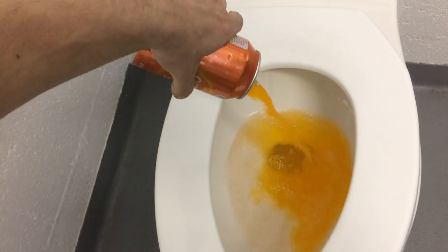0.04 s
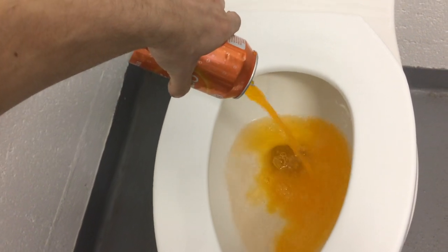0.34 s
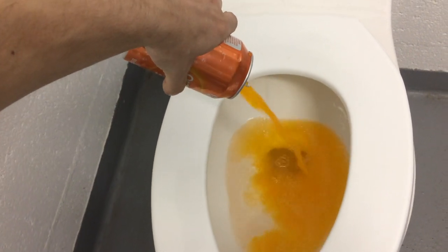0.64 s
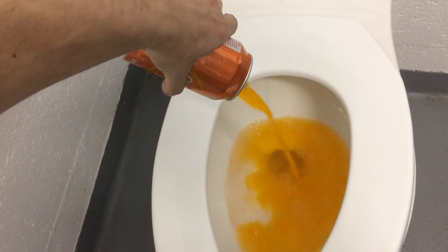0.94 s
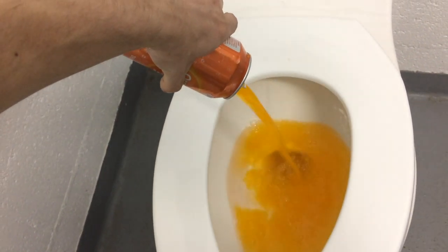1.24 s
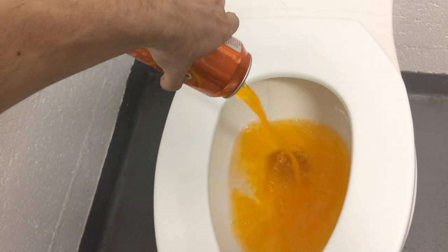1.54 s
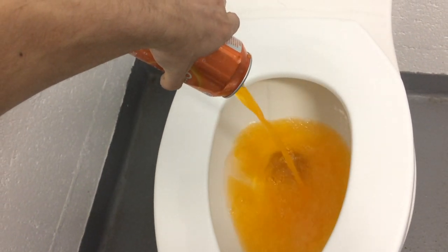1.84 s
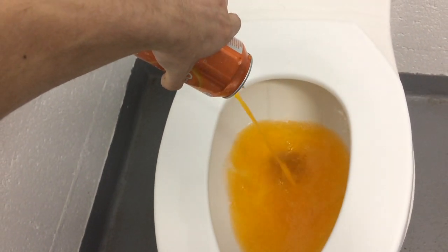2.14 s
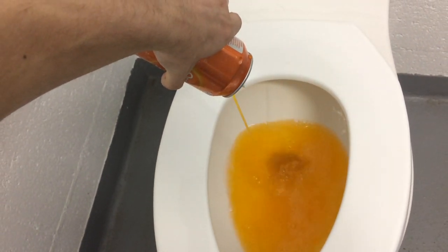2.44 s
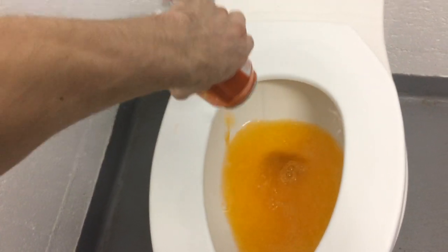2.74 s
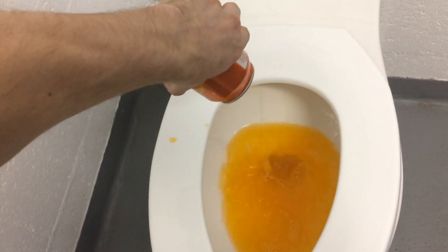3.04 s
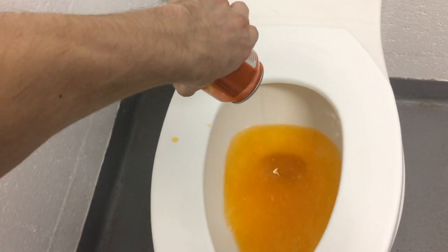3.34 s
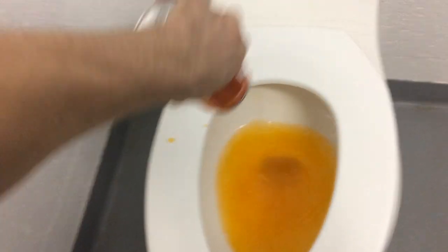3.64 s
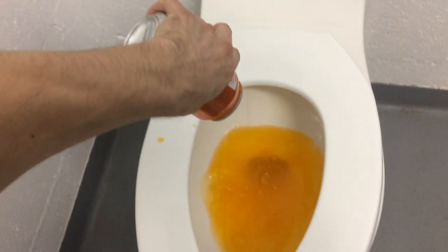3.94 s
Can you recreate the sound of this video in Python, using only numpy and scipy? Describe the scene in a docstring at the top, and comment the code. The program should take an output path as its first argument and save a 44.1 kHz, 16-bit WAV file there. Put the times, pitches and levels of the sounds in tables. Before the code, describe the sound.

A drink poured into toilet water bubbles and fizzes, ending in a few drips.

```python
"""Soda poured into a toilet bowl

A can is emptied close by in a small tiled bathroom. The stream drags air under: big pockets glug,
swarms of smaller bubbles burble and fizz, and spray smacks the surface. The stream thins to a
trickle and a few last drips plink, over the low hum of a fan."""
import sys
import numpy as np
from scipy import signal
from scipy.fft import rfft, irfft, next_fast_len
from scipy.io import wavfile
from scipy.ndimage import uniform_filter1d

SR = 44100
rng = np.random.default_rng(int(sys.argv[2]) if len(sys.argv) > 2 else 0)


def output_pcm(signal):
    """Save a mono or channel-first signal as 16-bit PCM at the path in sys.argv[1].

    Samples are clipped to [-1, 1] before scaling.
    """
    pcm = np.clip(np.atleast_2d(signal).T, -1, 1) * 32767
    wavfile.write(sys.argv[1], SR, np.round(pcm).astype(np.int16))


N = 176400

# Big air pockets: start_s, level_db, pitch_hz
GLUGS = [(0.023, -4, 318.6), (0.094, -3.5, 292), (0.153, -8.5, 297.4), (0.221, -16, 326), (0.273, -6, 281),
         (0.338, -4, 282.6), (.36, -4, 304), (0.407, -7, 284), (0.482, -11, 284), (0.613, -5.5, 314),
         (0.689, -10, 298.6), (0.802, -4.5, 299.7), (.842, -0.5, 284.3), (0.878, -10, 195),
         (.895, -5, 239.3), (.912, -2, 265.7), (0.964, -5.5, 281.5), (1.048, -6, 270.7),
         (1.234, -8.5, 305.6), (1.282, -6, 288.3), (1.402, 4, 274), (1.435, -1.5, 267.2),
         (1.492, -5.5, 273), (1.561, -4.5, 276.2), (1.776, -3.5, 280.2), (1.866, -14, 296.4),
         (1.931, -8.5, 276.4), (2.024, -4, 317.7), (2.07, -11.5, 293), (2.167, -18, 288),
         (2.228, -7, 258.7), (2.269, -6, 318), (2.358, -11, 352), (2.383, -10, 294)]


def glugs():
    """Large pockets of air boom in the bowl, each bending slightly up in pitch."""
    out = np.zeros(N)
    for start_s, level_db, pitch_hz in GLUGS:
        boom = bubble(pitch_hz, t60_s=0.24, glide=0.01344, rise_s=0.008, size=16000)
        add(out, start_s, amp(level_db - 0.5) * boom)
    return signal.lfilter(*signal.butter(2, 120, "high", fs=SR), out)


# Fader rides for the low, middle and upper swarms: time_s, level_db
GURGLE_FADER = [(0, -21.5), (.4, -14), (.55, -22.5), (.95, -18.5), (1.15, -19.5), (1.45, -18),
                (1.72, -21.5), (2.05, -18.5), (2.33, -14), (2.5, -21), (2.7, -30.5), (2.9, -38.5),
                (3.2, -48.5), (4, -83)]
PLOP_FADER = [(0, -17.5), (.12, -21.5), (.33, -26), (.5, -31), (.88, -28), (.96, -15.5), (1.1, -28.5),
              (1.7, -36), (2.3, -29.5), (2.48, -32), (2.57, -26), (2.66, -28.5), (2.73, -24.5),
              (2.9, -38.5), (3.1, -48), (4, -73)]
BURBLE_FADER = [(0, -13.5), (.12, -24), (.21, -15), (.34, -14.5), (.45, -36), (.57, -30), (.65, -17.5),
                (.85, -29), (1.02, -16.5), (1.2, -30.5), (1.37, -16), (1.43, -17), (1.55, -29.5),
                (1.85, -26.5), (2.25, -25), (2.6, -26.5), (2.85, -36.5), (3.1, -88)]
# Nasal tone of the burble: frequency_hz, gain_db
BURBLE_EQ = [(750, -22), (950, -4.5), (1080, 0), (1210, 10), (1330, -3), (1500, -1.5), (1850, 2.5),
             (2300, 3.5), (2900, -11)]


def bubbling():
    """The body of the pour: air dragged under rings as bubbles, the smaller the higher."""
    gurgle = swarm(per_s=190, band_hz=(251.5, 365.7), cycles=45.5, glide=0.039, spread_db=2, voices=20)
    plop = swarm(per_s=340, band_hz=(386, 742), cycles=54, glide=0.053, spread_db=3, voices=24)
    burble = swarm(per_s=1000, band_hz=(831, 2560), cycles=18.7, glide=0.081, spread_db=6)
    return (amp(-2.5) * ride(gurgle, GURGLE_FADER)
            + amp(-4.5) * ride(plop, PLOP_FADER)
            + amp(-3) * ride(eq(burble, BURBLE_EQ), BURBLE_FADER))


# Fader rides for tinkle and spray together, and for the foam's fizz: time_s, level_db
SPLASH_FADER = [(0, -15.5), (.12, -23.5), (.33, -18), (.55, -25.5), (.67, -24), (.87, -26), (1.02, -22),
                (1.35, -25.5), (1.7, -23.5), (2.1, -23), (2.4, -26), (2.65, -33.5), (2.88, -36.5),
                (3.1, -41.5), (4, -58.5)]
FIZZ_FADER = [(0, -34), (.3, -33.5), (.55, -37), (.68, -37), (.85, -31.5), (1.1, -36.5), (1.35, -33.5),
              (1.7, -31), (2.35, -32), (2.6, -39.5), (2.9, -37.5), (3.2, -47), (4, -52)]
# Tone of the three bright layers: frequency_hz, gain_db
TINKLE_EQ = [(1500, -20), (2700, 5), (3700, 1.5), (4300, 1), (5100, 7), (5800, -0.5), (7000, -2.5)]
FIZZ_EQ = [(6000, 2), (8000, -1), (11500, -4), (15000, -9.5)]
SPRAY_EQ = [(150, -13), (500, -3.5), (1200, 3.5), (2500, 3), (5000, -5), (8000, -10.5), (15000, -12.5)]


def fizz_and_spray():
    """The top end: small bubbles tinkle, the finest fizz as foam, and droplets patter on the water."""
    tinkle = swarm(per_s=800, band_hz=(2470, 7350), cycles=13, glide=0.06, spread_db=6)
    fizz = swarm(per_s=580, band_hz=(6200, 15200), cycles=14, glide=0.078, spread_db=5, scatter=0.95)
    droplets = rng.choice([-1, 1], N) * (rng.random(N) < 700 / SR)  # about 700 ticks a second
    droplets = droplets * amp(5.2 * np.minimum(rng.exponential(1, N), 4))
    spray = bowl(droplets, scatter=0.4)[:N]
    return (amp(-6) * ride(eq(tinkle, TINKLE_EQ), SPLASH_FADER)
            + amp(-6) * ride(eq(spray, SPRAY_EQ), SPLASH_FADER)
            + amp(-2) * ride(eq(fizz, FIZZ_EQ), FIZZ_FADER))


# Spray hitting the water: start_s, level_db, pitch_hz, click_vs_bubble_db
SMACKS = [(0.0246, -3.5, 2320, -0.5), (0.036, -8, 6300, -2), (0.0834, -8, 5000, -16),
          (0.119, -28.5, 6040, 14), (0.203, -22, 5400, 7), (0.227, -3.5, 4900, -5.5), (0.281, -8, 2900, -1),
          (0.328, -2.5, 1200, -11), (.3346, -4, 3930, -3), (0.595, -12, 1280, 0.5),
          (0.6204, -9.5, 2770, -3), (0.6504, -6.5, 2290, -6), (.657, -18.5, 5300, 6),
          (0.6934, -10, 7300, -5.5), (0.731, -14, 6160, -8), (0.7977, -6, 4420, -3.5),
          (0.9307, -16.5, 3800, 14), (0.9803, -5, 4800, -4.5), (1.069, -14.5, 4400, 5),
          (1.1742, -4.5, 2920, -5.5), (1.1888, -18.5, 5330, 6), (1.2527, -8.5, 6750, -18),
          (1.2875, -11.5, 2840, 0.5), (1.3078, -11, 4800, 5), (1.4008, -1, 4700, -1.5),
          (1.444, -6.5, 1620, -3), (1.492, -5, 9200, -5.5), (1.5563, -9, 4900, -9), (1.568, -14.5, 5100, 3),
          (1.583, -20, 7300, 11), (1.7728, -15, 5700, 11), (1.9014, -10, 3900, 2.5), (1.909, -9.5, 5170, 1),
          (2.0188, -4.5, 4300, -11), (2.043, -26.5, 5900, 11), (2.1559, -9.5, 3430, -19),
          (2.171, -17.5, 8700, 6), (2.2277, -16.5, 8160, -6), (2.2518, -4, 2650, -28),
          (2.2693, -13, 7200, -5.5), (2.353, -13.5, 2960, -24), (2.4403, -10, 3610, -7),
          (2.4919, -16.5, 9200, -1), (2.539, -11.5, 1990, -6), (2.559, -11.5, 1270, -5.5),
          (2.6162, -9, 3370, -9), (2.618, -13, 2900, -13), (2.6385, -23, 5780, 2.5),
          (2.644, -14, 1960, -23), (2.735, -22.5, 5500, 2.5), (2.847, -22, 7900, -12)]


def smacks(cycles=22):
    """Sharp hits of spray, each with a bubble that dies within a set number of cycles."""
    hits = [(start_s, db, hz, click_db, cycles / hz) for start_s, db, hz, click_db in SMACKS]
    return impacts(hits, click_s=0.0033, glide=0.084, ring_scatter=0.96, click_scatter=0.69, gain_db=-6.5)


# Last drips from the can: start_s, level_db, pitch_hz, click_vs_bubble_db, bubble_t60_s
DRIPS = [(2.9168, -15.5, 7420, -6, 0.0058), (2.9407, -19, 3880, 0.5, 0.019), (2.947, -21.5, 2120, 2, 0.06),
         (2.9796, -20, 2110, -8, 0.053), (3.1622, -25.5, 8840, 3, 0.0051), (3.167, -35, 6500, -2, 0.0065),
         (3.1955, -14.5, 2380, -9, 0.013), (3.196, -17, 3500, 0, 0.01), (3.876, -47, 7240, -8, 0.0055),
         (3.8996, -19, 2240, -2, 0.019), (3.903, -23, 3600, 0.5, 0.017), (3.9075, -25, 2350, -18, 0.012)]


def drips():
    """Single drops plink into the bowl with an upward chirp."""
    return impacts(DRIPS, click_s=0.0026, glide=0.14, ring_scatter=0.61, click_scatter=1, gain_db=-3.5)


# Snap of a drop on the surface: frequency_hz, gain_db
CLICK_EQ = [(200, -8), (1000, -1), (2500, 10.5), (5000, 5), (8000, -2.5), (12000, -3.5), (16000, -9)]


def impacts(hits, click_s, glide, ring_scatter, click_scatter, gain_db, size=3000):
    """Each drop clicks and traps a bubble; a smaller bubble has a thinner, slightly longer click."""
    out, t = np.zeros(N), np.arange(size) / SR
    for start_s, level_db, pitch_hz, click_db, t60_s in hits:
        ring = bowl(bubble(pitch_hz, t60_s, glide, rise_s=0.000072, size=size), ring_scatter)
        envelope = np.exp(-t / click_s * np.sqrt(4000 / pitch_hz)) * (1 - np.exp(-t / 0.0002))
        burst = eq(rng.standard_normal(size) * envelope, CLICK_EQ)
        low_cut = signal.butter(2, min(0.82 * pitch_hz, SR / 3), "high", fs=SR)
        click = bowl(signal.lfilter(*low_cut, burst), click_scatter)
        # Balance the two by their loudest 3 ms.
        ring, click = (x / np.sqrt(uniform_filter1d(x ** 2, size=130).max()) for x in (ring, click))
        add(out, start_s, amp(level_db + gain_db) * (ring + amp(click_db) * click))
    return out


# Surges of the churn: time_s, level_db
CHURN_FADER = [(0, -33.5), (.25, -51), (.34, -47), (.45, -35.5), (.8, -46), (1.05, -29), (1.2, -37),
               (1.35, -31.5), (1.53, -37), (1.62, -27.5), (1.75, -30), (1.85, -56), (2.6, -50), (3, -93)]
# Its bass-heavy tone: frequency_hz, gain_db
CHURN_EQ = [(20, -22), (40, -5), (70, 14.5), (115, -2.5), (160, -9), (250, -34), (1000, -64)]


def churn():
    """Water rumbles as it churns under the stream."""
    return ride(eq(rng.standard_normal(N), CHURN_EQ), CHURN_FADER)


def swarm(per_s, band_hz, cycles, glide, spread_db, scatter=1, voices=48, chances=400):
    """Bubbles of many sizes born at random moments; a few are much stronger."""
    out = np.zeros(N)
    low_hz, high_hz = band_hz
    for voice in range(voices):
        hz = low_hz * (high_hz / low_hz) ** ((voice + rng.random()) / voices)
        t60_s = cycles * rng.uniform(0.85, 1) / hz
        ring = bowl(bubble(hz, t60_s, glide * rng.random(), rise_s=0.71 / hz), scatter)
        ring /= np.linalg.norm(ring)
        position, dice, rarity = rng.random((3, chances))
        born = dice < per_s * N / SR / voices / chances
        boosts_db = spread_db * np.minimum(-np.log(rarity[born]), 4)
        for start_s, boost_db in zip(position[born] * N / SR, boosts_db):
            add(out, start_s, ring * amp(boost_db))
    return out


def bubble(hz, t60_s, glide, rise_s, size=6000):
    """A dying sine whose pitch climbs by the fraction `glide` as the bubble nears the surface."""
    t = np.arange(size) / SR
    pitch_hz = hz * (1 + glide * np.minimum(t / t60_s, 1))
    envelope = (1 - np.exp(-t / rise_s)) * amp(-60 * t / t60_s)
    return np.sin(2 * np.pi * np.cumsum(pitch_hz) / SR) * envelope


def bowl(x, scatter, t60_s=0.041, size=2000):
    """Direct sound and a quick scatter of reflections off the porcelain, different for each spot."""
    t = np.arange(size) / SR
    taps = rng.standard_normal(size) * (rng.random(size) < 0.1)
    taps *= (t > 0.0006) * amp(-60 * t / t60_s)
    taps *= scatter * amp(3) / np.linalg.norm(taps)
    taps[0] = 1  # direct sound
    return signal.fftconvolve(x, taps)


# Resonances of bowl and room: pitch_hz, gain_db, t60_s
MODES = [(195, 10.5, 1.6), (277, 2, 0.55), (336, -25, 0.8), (338, 1, 1.3), (503, 5, 0.96),
         (599.5, 7.5, 0.4), (720, 5.5, 0.7), (942, 12, 0.61), (1148, -2.5, 0.16), (1220, -15, 1.9),
         (1338, 13, 1), (1778, 7, 0.49), (1902, 8.5, 0.59)]


def standing_waves(x):
    """Modes that hang on after the glugs and bubbles."""
    t = np.arange(SR) / SR
    ringing = np.zeros(SR)
    for pitch_hz, gain_db, t60_s in MODES:
        buildup = t60_s * SR / (2 * np.log(1000))  # the mode's own gain at resonance
        ringing += amp(gain_db - 60 * t / t60_s) * np.cos(2 * np.pi * pitch_hz * t) / buildup
    return signal.fftconvolve(x, ringing)[:N]


# Reverb time of the bathroom: frequency_hz, t60_s
ROOM_DECAY = [(200, 0.13), (1000, 1), (2400, 0.8), (4000, 0.77), (7000, 0.33), (15000, 0.47)]


def room(x, predelay_s=0.014):
    """Diffuse tail off the tiles, longest in the mids."""
    hz, t, spectrum = signal.stft(rng.standard_normal(SR), SR, nperseg=256)
    decay = amp(-60 * t / curve_at(ROOM_DECAY, hz)[:, None])
    tail = signal.istft(spectrum * decay, SR, nperseg=256)[1]
    tail *= np.clip((np.arange(len(tail)) / SR - predelay_s) / 0.0023, 0, 1)
    return signal.fftconvolve(x, tail / np.linalg.norm(tail))[:N]


# Hum of the fan: pitch_hz, level_db
FAN_HUM = [(65.4, -42), (59.9, -44), (80.1, -43.5), (125.8, -50)]
# Tone of its air noise: frequency_hz, gain_db
AIR_EQ = [(20, -12), (45, 0), (75, -1), (100, -5), (160, -7.5), (260, -14), (500, -9.5), (1000, -19.5),
          (2000, -26), (3500, -30.5), (6000, -21.5), (10000, -27.5), (15000, -29)]


def fan():
    """Close low tones beat against each other over a soft bed of air."""
    t = np.arange(N) / SR
    hum = sum(amp(db) * np.sqrt(2) * np.sin(2 * np.pi * (hz * t + rng.random())) for hz, db in FAN_HUM)
    air = eq(rng.standard_normal(N), AIR_EQ)
    return hum + amp(-43) * air / np.sqrt(np.mean(air ** 2))


def amp(db):
    """Decibels to gain."""
    return 10 ** (np.asarray(db) / 20)


def curve_at(points, hz):
    """Reads a curve on a log-frequency axis."""
    points_hz, values = np.transpose(points)
    return np.interp(np.log(hz + 1), np.log(points_hz), values)


def eq(x, points):
    """Filters by an EQ curve."""
    n = next_fast_len(len(x) + 1024)
    gain = amp(curve_at(points, np.fft.rfftfreq(n, 1 / SR)))
    return irfft(rfft(x, n) * gain, n)[:len(x)]


def ride(x, fader, window=5000):
    """Evens out the slow level, keeping the grain, then follows a fader curve."""
    power = uniform_filter1d(uniform_filter1d(x ** 2, window), window)
    even = x / np.sqrt(abs(power) + np.mean(x ** 2) / 100)
    return even * amp(np.interp(np.arange(N) / SR, *np.transpose(fader)))


def add(mix, start_s, sound):
    """Mixes a sound in at its cue."""
    part = mix[max(round(start_s * SR), 0):][:len(sound)]
    part += sound[:len(part)]


def scene():
    """Mono mix of pour, drips and glugs in the ringing room, over the fan."""
    pour = bubbling() + fizz_and_spray() + churn() + smacks()
    plinks = drips()
    booms = glugs()
    reverb = room(amp(-10.5) * pour + amp(-9.5) * plinks + amp(-9) * booms)
    return (pour + plinks + booms + reverb + standing_waves(pour + booms) + fan())[None]


def record(dry):
    """The loudest peaks clip, then a steep high cut takes off the very top."""
    high_cut = signal.firwin(401, 15600, window=("kaiser", 8), fs=SR)
    return signal.oaconvolve(np.clip(dry, -1, 1), high_cut[None], "same")


dry = scene()
out = record(dry)
output_pcm(out)
```